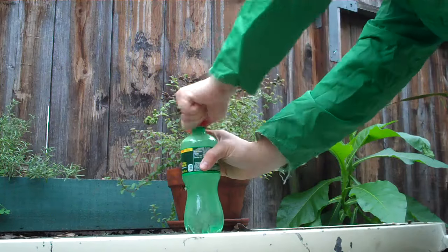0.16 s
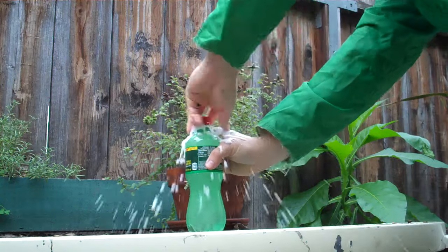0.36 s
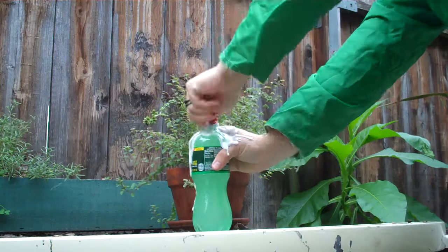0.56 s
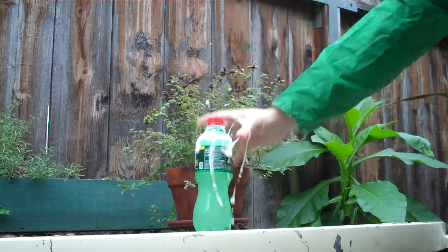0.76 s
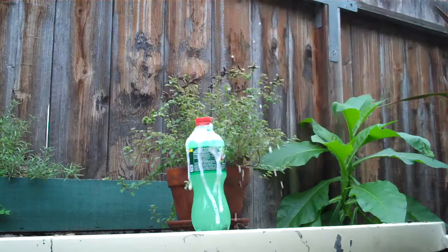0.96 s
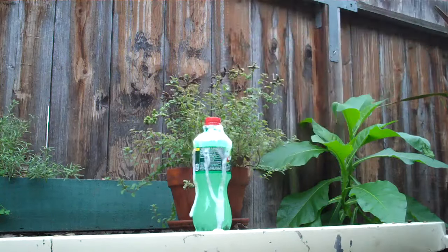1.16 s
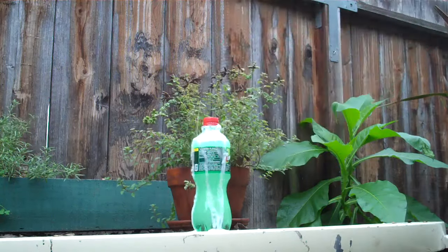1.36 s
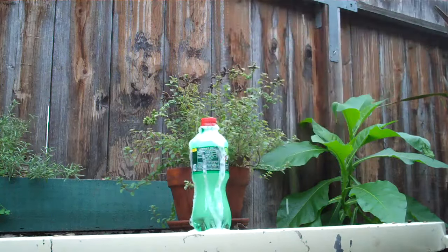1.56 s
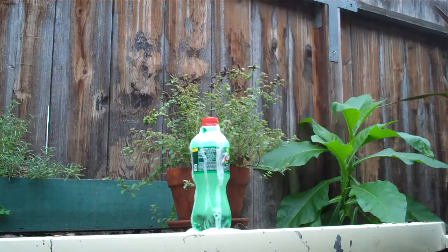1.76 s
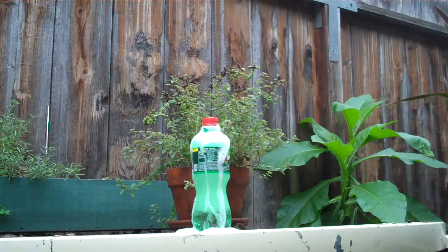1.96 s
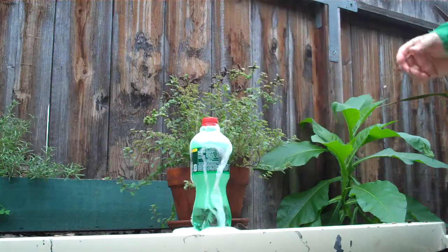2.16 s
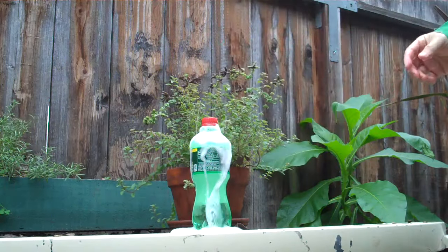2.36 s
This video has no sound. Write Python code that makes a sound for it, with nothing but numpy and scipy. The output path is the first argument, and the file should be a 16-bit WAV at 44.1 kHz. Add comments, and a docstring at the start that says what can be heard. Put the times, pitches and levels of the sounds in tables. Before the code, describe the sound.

A sharp hiss bursts from a plastic soda bottle, heard up close outdoors. The cap clicks shut, the bottle rocks on a hollow table, then the overflow patters and fizzes softly, with short spurts and a small glug.

```python
"""A garden table in front of a wooden fence, with a microphone pair close to a shaken soda bottle.
The cap is cracked open: gas hisses through the thread and spray slaps the hand. The plastic clicks,
the cap knocks the hollow neck as it is twisted shut, and the bottle rocks on the ringing table top.
Spilt soda patters and fizzes on, with wet spurts and a glug. Table, planter and fence throw back
short echoes; a faint hum and rumble lie far behind."""
import sys
import numpy as np
from scipy import signal
from scipy.fft import rfft, irfft
from scipy.io import wavfile

SR = 44100
rng = np.random.default_rng(int(sys.argv[2]) if len(sys.argv) > 2 else 0)


def pcm_store(signal):
    """Save signal as 16-bit PCM."""
    levels = np.round(np.clip(np.atleast_2d(signal), -1, 1) * 32767)
    wavfile.write(sys.argv[1], SR, levels.astype(np.int16).T)


N = 110250
T = np.arange(N) / SR
HZ = np.maximum(np.fft.rfftfreq(2 * N, 1 / SR), 1)


def undb(db):
    """Decibels to amplitude."""
    return 10 ** (np.asarray(db) / 20)


def unit(x):
    """Scale to rms 1."""
    return x / np.sqrt(np.mean(x ** 2) + 1e-20)


def curve(rows):
    """Points joined by straight lines in time."""
    times, values = np.transpose(rows)
    return np.interp(T, times, values)


def across(points):
    """Points joined on a log-frequency axis."""
    hz, values = np.transpose(points)
    return np.interp(np.log(HZ), np.log(hz), values)


def filtered(x, response):
    """Apply a frequency response given on HZ."""
    return irfft(rfft(x, 2 * N) * response)[..., :N]


def colour(points, tilt_db=0):
    """Causal filter of unit power from a spectrum and a tilt per octave above 200 Hz."""
    gain = unit(undb(across(points) + tilt_db * np.log2(np.maximum(HZ, 200))))
    cepstrum = irfft(np.log(gain))[:N]
    cepstrum[0] /= 2
    return np.exp(rfft(2 * cepstrum, 2 * N))


def focused(response, hz, lift_db, octaves=0.38):
    """Lift one broad resonance out of a filter and scale to unit power."""
    lifted = response * undb(lift_db * np.exp(-.5 * (np.log2(HZ / hz) / octaves) ** 2))
    return lifted / np.sqrt(np.mean(np.abs(lifted) ** 2))


def noise():
    """White noise, rms 1."""
    return rng.standard_normal(N)


def walk(hz):
    """Smooth random motion, spread 1."""
    return unit(filtered(noise(), np.exp(-(HZ / hz) ** 2)))


def grains(per_s, spread_db):
    """Random tiny impacts of uneven strength."""
    happens = rng.random(N) < per_s / SR
    signs = rng.choice([-1, 1], N)
    strength = undb(spread_db * np.minimum(rng.exponential(size=N), 6))
    return unit(happens * signs * strength)


def swell(at, rise, decay):
    """Rounded rise to a peak, then exponential fall; times in seconds."""
    return np.exp(-(np.minimum(T - at, 0) / rise) ** 2 - np.maximum(T - at, 0) / decay)


def ringing(modes, at):
    """Decaying modes set off at one moment."""
    age = np.maximum(T - at, 0)
    return sum(undb(db) * np.sin(2 * np.pi * hz * age) * np.exp(-np.log(1000) * age / t60)
               for hz, db, t60 in modes)


def wide(mid, side, side_db):
    """Spread a source between left and right; the bass stays near the middle."""
    spread = undb(side_db) * np.sqrt((HZ + 200) / (HZ + 2560))
    total = np.sqrt(1 + spread ** 2)
    return filtered(mid, 1 / total) + filtered(side, spread / total) * np.array([[1], [-1]])


def garden(hum_hz=64.8, hum_width_hz=6.4):
    """Quiet outdoor air all round, with a low hum and rumble from far off."""
    # Spectra of the air and the rumble. Each row: frequency in Hz, relative level in dB.
    air_colour = [(25, -6), (100, -3), (180, -23), (300, -9), (480, -11), (1160, -6), (3000, -20),
                  (5000, -12), (9000, -23), (14000, -28)]
    rumble_colour = [(20, -6), (45, -8), (100, -10), (150, 0.5), (220, -7.5), (500, -25), (2000, -59)]
    # Drift of the hum and the rumble. Each row: time in seconds, level in dB.
    hum_levels = [(0, -74), (0.25, -59), (0.45, -83), (0.75, -65), (1.2, -59), (2.0, -53), (2.5, -61.5)]
    rumble_levels = [(0, -54), (0.5, -69.5), (1.0, -62), (1.5, -55), (2.1, -54), (2.5, -57.5)]
    air = filtered(wide(noise(), noise(), side_db=-3), colour(air_colour))
    hum = unit(filtered(noise(), 1 / (1 + (2 * (HZ - hum_hz) / hum_width_hz) ** 2)))
    rumble = filtered(noise(), colour(rumble_colour))
    return undb(-51.5) * air + undb(curve(hum_levels)) * hum + undb(curve(rumble_levels)) * rumble


def bubbles(per_s=320, centre_hz=2333, octaves_each_way=1.4, decay_cycles=20, pitch_rise=.08):
    """Small bubbles in the foam ring briefly and rise in pitch."""
    out = np.zeros((2, N))
    t = T[:2048]
    for when, pitch, strength, pan in rng.random((int(per_s * N / SR), 4)):
        hz = centre_hz * 2 ** (octaves_each_way * (2 * pitch - 1))
        age = t * hz / decay_cycles
        glide = 1 + pitch_rise * np.tanh(age / 2)
        ring = np.sin(2 * np.pi * hz * t * glide) * np.exp(-age)
        gains = np.sqrt([[pan], [1 - pan]]) * undb(33 * strength) * np.sqrt(hz)
        start = int(when * (N - len(t)))
        out[:, start:start + len(t)] += gains * ring
    return unit(out)


def patter(drops_per_s=5000):
    """Spilt soda rains on table and ground while its foam bursts."""
    # Spectrum of the drops. Each row: frequency in Hz, relative level in dB.
    drop_colour = [(150, -32), (300, -12.5), (480, -11.5), (700, -11), (1100, -9), (1700, -3.5),
                   (2500, -1.5), (4200, -7), (6000, -7.5), (8700, -12), (10500, -17.5), (14000, -35.5)]
    # Course of drops and foam, faint before the spill. Each row: time in seconds, level in dB.
    levels = [(0.0, -54), (0.45, -71), (0.64, -45), (0.7, -52), (0.8, -45.5), (0.92, -46.5), (1.08, -40.5),
              (1.33, -40), (1.55, -41.5), (1.68, -38), (1.9, -40.5), (2.15, -39.5), (2.27, -44.5),
              (2.5, -41.5)]
    drops = wide(grains(drops_per_s, spread_db=0.5), grains(drops_per_s, spread_db=0.5), side_db=-6.5)
    wet = filtered(drops, colour(drop_colour)) + undb(-7.5) * bubbles()
    flicker_db = 0.51 * walk(hz=23)
    return wet * undb(curve(levels) + flicker_db)


def clicks():
    """The plastic of cap and bottle wall snaps: one sharp impulse and a short dry ring."""
    # Snaps. Each row: start in seconds, level in dB, tilt in dB per octave, resonance in Hz.
    snaps = [(0.08, -41, -5, 3700), (0.53, -31.5, -0.5, 2200), (0.535, -36, 0, 3600),
             (0.6818, -26.5, 3, 2140), (0.6841, -35, 0, 3980), (0.705, -34, -0.5, 2000),
             (0.717, -27, 4, 2000), (0.737, -35, -5, 3530), (0.757, -31, -11, 1300), (1.4165, -30, 7, 4000),
             (2.173, -28, 1.5, 8300)]
    # Spectrum of the plastic. Each row: frequency in Hz, relative level in dB.
    plastic_colour = [(200, -28), (450, -16), (750, -9.5), (1300, 0), (2200, 3.5), (5000, 1), (9000, -4),
                      (14000, -27)]
    scale = np.sqrt(0.0034 * SR / N)  # gives the impulse the energy of 3.4 ms at rms 1
    out = 0
    for at, db, tilt, hz in snaps:
        impulse = unit(np.diff(T >= at, prepend=False) * 1.)
        ring = unit(wide(noise(), noise(), side_db=0) * swell(at, rise=0.00012, decay=0.0054))
        snap = scale * (impulse + undb(3.5) * ring)
        tone = focused(colour(plastic_colour, tilt), hz, lift_db=9)
        out = out + undb(db) * filtered(snap, tone)
    return out


def jet(opens_s=0.1897, opening_s=.003, shuts_s=0.59, shutting_s=0.044):
    """Gas hisses through the cap's thread in surges, sputtering slightly as liquid chokes the gap."""
    # Surges as the seal lets go. Each row: peak time in seconds, level in dB, rise and decay in
    # seconds, tilt in dB per octave, resonance in Hz.
    surges = [(0.199, -38, 0.0038, 0.022, 2, 4500), (0.2135, -15.5, 0.0052, .003, 0.5, 3720),
              (0.2208, -7.5, 0.0031, 0.011, 1, 3700), (0.226, -9.5, 0.0023, 0.021, -2, 2900),
              (0.25, -19, .005, 0.027, -2, 4200), (0.276, -14, 0.044, .048, 3, 6260),
              (0.386, -31.5, 0.18, 0.11, -2.5, 2080)]
    # Spectrum of the hiss. Each row: frequency in Hz, relative level in dB.
    hiss_colour = [(60, -37), (250, -38), (600, -27), (1000, -22.5), (1400, -13), (1900, -8.5), (2800, -3),
                   (3700, -1), (5500, -2), (8500, -8), (10000, -8), (13500, -25.5)]
    sputter = unit(undb(0.5 * walk(hz=218)))
    gap = np.clip((T - opens_s) / opening_s, 0, 1) * np.exp(-np.maximum(T - shuts_s, 0) / shutting_s)
    out = 0
    for at, db, rise, decay, tilt, hz in surges:
        gas = wide(noise(), noise(), side_db=-11) * gap * sputter * swell(at, rise, decay)
        tone = focused(colour(hiss_colour, tilt), hz, lift_db=4)
        out = out + undb(db) * filtered(gas, tone)
    return out


def splat():
    """The first sheet of spray slaps the hand with a dull flutter."""
    # Slaps. Each row: peak time in seconds, level in dB, rise and decay in seconds.
    slaps = [(0.225, -37, 0.0066, 0.016), (.268, -38.5, 0.026, 0.023)]
    # Spectrum of spray on skin. Each row: frequency in Hz, relative level in dB.
    slap_colour = [(40, -9), (150, -9), (280, -2), (500, -5), (1000, -1), (2500, -14), (10000, -40)]
    envelope = sum(undb(db) * swell(at, rise, decay) for at, db, rise, decay in slaps)
    return filtered(noise() * envelope, colour(slap_colour))


def knocks(low_cut_hz=450):
    """The cap is twisted shut and knocks the hollow neck, which is too small to carry bass."""
    # Knocks of the cap. Each row: start in seconds, level in dB.
    strikes = [(0.5295, -33), (0.5355, -42.5)]
    # Modes of the neck. Each row: frequency in Hz, relative level in dB, seconds to fall 60 dB.
    neck_modes = [(662, 5.5, 0.034), (818, 6.5, 0.032), (943, -1, 0.095), (2020, -10, 0.068),
                  (2100, -24, .07)]
    tocks = sum(undb(db) * ringing(neck_modes, at) for at, db in strikes)
    return filtered(tocks, (1j * HZ / (1j * HZ + low_cut_hz)) ** 2)


def spurts(grains_per_s=12000):
    """Soda gushes in short bursts of dense fizz."""
    # Gushes. Each row: peak time in seconds, level in dB, rise and decay in seconds,
    # tilt in dB per octave, resonance in Hz.
    gushes = [(0.575, -39.5, 0.036, .01, 1, 3500), (0.72, -34, 0.035, 0.041, 0, 8550),
              (0.884, -45, 0.011, 0.12, 1.5, 6000), (1.17, -27.5, 0.026, 0.066, 2.3, 6640),
              (1.225, -37, 0.038, 0.071, -1, 3680), (1.376, -31.5, 0.0095, 0.011, 1, 4500),
              (1.417, -28, 0.021, 0.021, 0.5, 2900), (1.692, -37, 0.0078, 0.011, -2.5, 1300),
              (2.189, -31.5, 0.02, 0.019, .3, 8800)]
    # Spectrum of the fizz. Each row: frequency in Hz, relative level in dB.
    fizz_colour = [(150, -51), (300, -7), (650, -5), (1400, -4), (2300, -4), (3200, -2.5), (4500, -3.5),
                   (6500, -7), (8800, -7.5), (10500, -11.5), (14000, -26.5)]
    fizz = wide(grains(grains_per_s, spread_db=3), grains(grains_per_s, spread_db=3), side_db=-3)
    out = 0
    for at, db, rise, decay, tilt, hz in gushes:
        tone = focused(colour(fizz_colour, tilt), hz, lift_db=7)
        out = out + undb(db) * filtered(fizz * swell(at, rise, decay), tone)
    return out


def bumps(rise_s=0.0086):
    """The bottle is let go: its feet thud and judder on the table, whose hollow top rings."""
    # Rocking. Each row: time in seconds, scrape level in dB, scrape decay in seconds, thud level in dB.
    contacts = [(0.677, -34.5, 0.031, -60), (0.693, -36, 0.053, -57), (0.709, -36, 0.037, -38),
                (0.753, -32, 0.02, -37), (0.943, -42.5, 0.03, -41), (1.02, -46, 0.059, -54),
                (1.066, -46, 0.048, -61), (1.17, -46, 0.059, -51), (1.391, -52.5, 0.036, -68)]
    # Modes of the table top. Each row: frequency in Hz, relative level in dB, seconds to fall 60 dB.
    table_modes = [(183, -19, 0.16), (256, -0.5, 0.37), (313, 2, 0.19), (450.3, -2.5, 0.21), (705, -8, .1),
                   (850, -22, .12)]
    # Spectrum of the scrape. Each row: frequency in Hz, relative level in dB.
    scrape_colour = [(60, -25), (140, -14.5), (190, 3.5), (300, -1), (450, 1), (600, -8), (1300, -4),
                     (2400, -9.5), (5000, -28), (12000, -45)]
    ring = rfft(ringing(table_modes, 0), 2 * N)
    table_top = 1 + undb(6) * 1j * ring / np.abs(ring).max()
    judder = grains(per_s=4000, spread_db=2.3)
    out = 0
    for at, scrape_db, decay, thud_db in contacts:
        tilt = -0.02 * (scrape_db + 40)  # softer scrapes are a touch brighter
        scrape = filtered(judder * swell(at, rise_s, decay), table_top * colour(scrape_colour, tilt))
        out = out + undb(scrape_db) * scrape + undb(thud_db) * ringing(table_modes, at)
    return out


def glugs():
    """Larger bubbles in the overflow, each a short rising note."""
    # Bubbles. Each row: peak time in seconds, pitch there in Hz, level in dB, climb in Hz per second.
    notes = [(1.628, 497, -41.5, 900), (1.641, 1025, -40.5, 1500)]
    out = 0
    for at, hz, db, climb in notes:
        note = np.sin(2 * np.pi * (T - at) * (hz + climb * (T - at) / 2))
        out = out + undb(db) * swell(at, rise=0.0086, decay=0.012) * note
    return out


def yard(x, t60_s=0.19, tail_db=-11):
    """Nearby surfaces send the microphones a few reflections and a short scattered tail."""
    # Echoes from table, planter and fence. Each row: delay in seconds, dB against the direct sound.
    echoes = [(.0012, -34), (.0058, -23.5), (0.0117, -18.5)]
    early = 1 + sum(undb(db) * np.exp(-2j * np.pi * HZ * delay) for delay, db in echoes)
    tail = rng.standard_normal((2, N)) * swell(.008, rise=0.009, decay=t60_s / np.log(1000))
    scatter = rfft(unit(tail) / np.sqrt(N), 2 * N) * HZ / (HZ + 900)  # thin in the bass
    power = 1 + undb(tail_db) ** 2 + sum(undb(db) ** 2 for _, db in echoes)
    return filtered(x, early + undb(tail_db) * scatter) / np.sqrt(power)


def scene():
    """The bottle up close with its echoes, and the garden behind."""
    bottle = patter() + clicks() + jet() + splat() + knocks() + spurts() + bumps() + glugs()
    return yard(bottle) + garden()


def record(dry, ceiling=.85, top_hz=14150):
    """Two unlike microphone ports, a soft ceiling near full scale and a steep top cut."""
    # Balance of the pair. Each row: frequency in Hz, left over right in dB.
    balance = [(60, 2), (2400, 1.5), (4400, 1.5), (6000, 0.5), (8000, -6.5), (9500, -3.5), (11500, 7),
               (14000, 4)]
    # Phase of the pair. Each row: frequency in Hz, lead of the left in radians.
    phase = [(100, 0), (4000, 0.5), (6000, 1.1), (7500, 1.73), (9000, 0.5), (11000, 4), (14000, 0.5)]
    half = np.array([[.5], [-.5]])
    ports = filtered(dry, undb(half * across(balance)) * np.exp(1j * half * across(phase)))
    held = ports / (1 + (ports / ceiling) ** 6) ** (1 / 6)
    top_cut = signal.ellip(10, .1, 60, top_hz, fs=SR, output="sos")
    return signal.sosfiltfilt(top_cut, held)


dry = scene()
out = record(dry)
pcm_store(out)
```